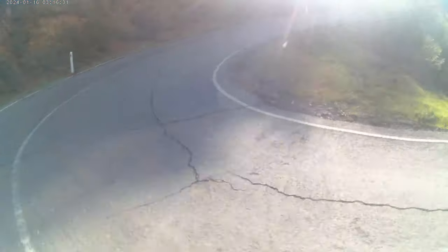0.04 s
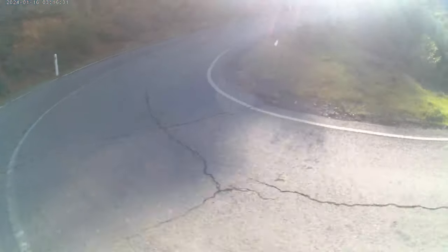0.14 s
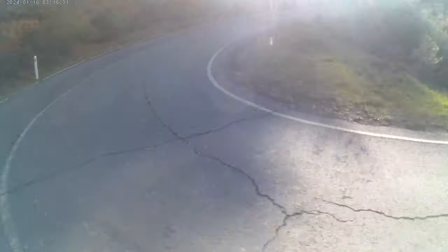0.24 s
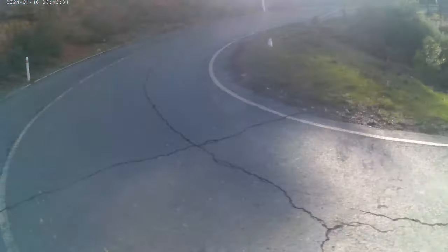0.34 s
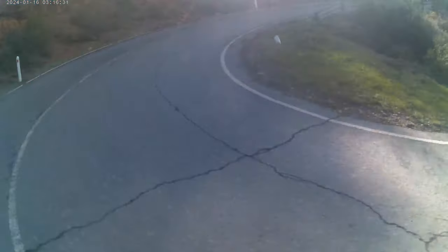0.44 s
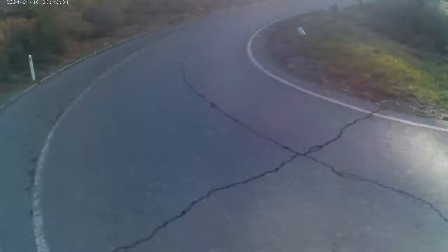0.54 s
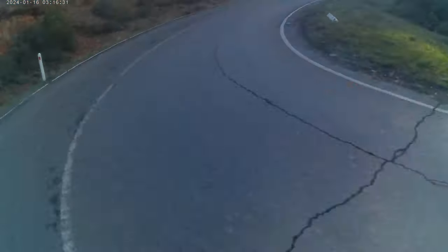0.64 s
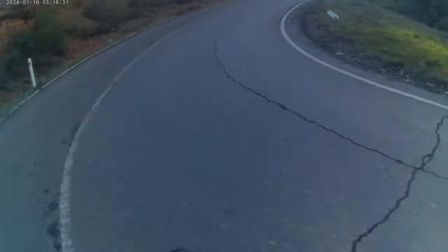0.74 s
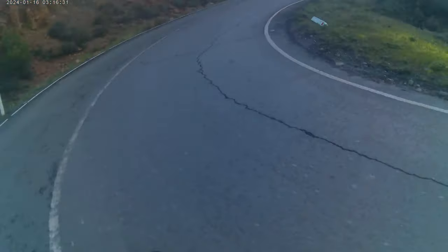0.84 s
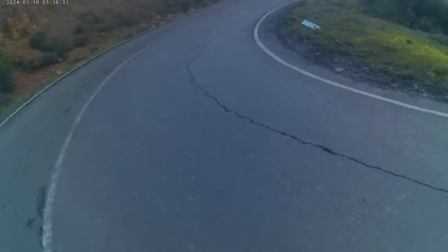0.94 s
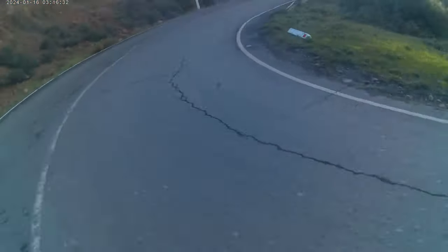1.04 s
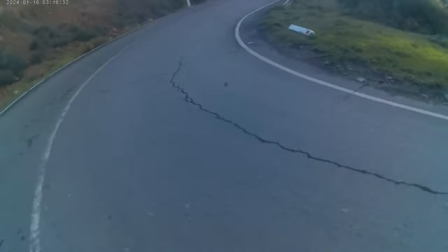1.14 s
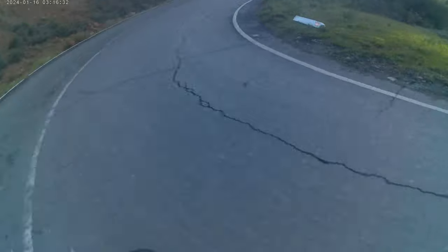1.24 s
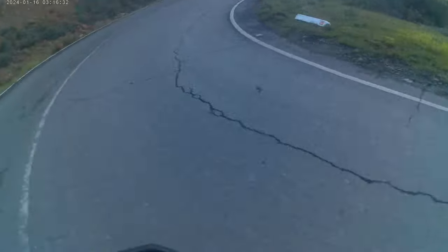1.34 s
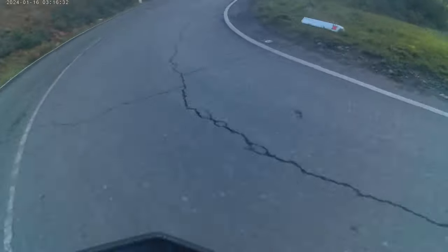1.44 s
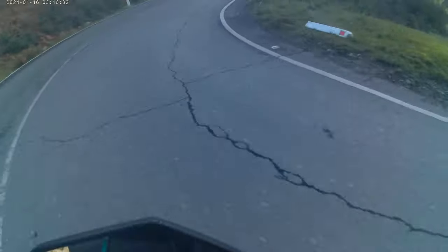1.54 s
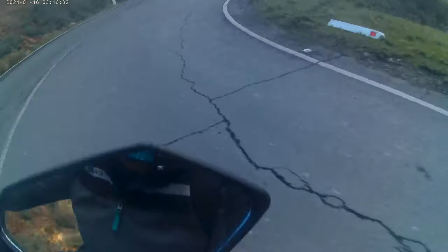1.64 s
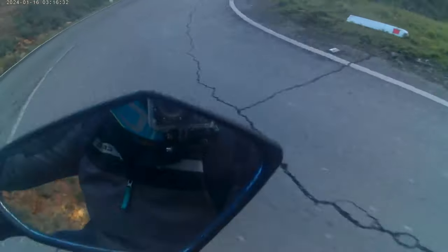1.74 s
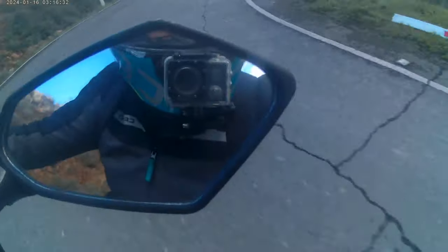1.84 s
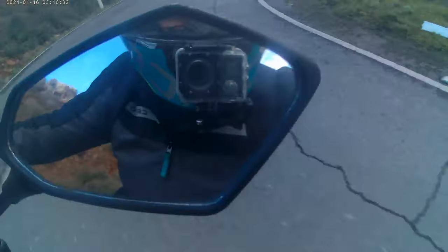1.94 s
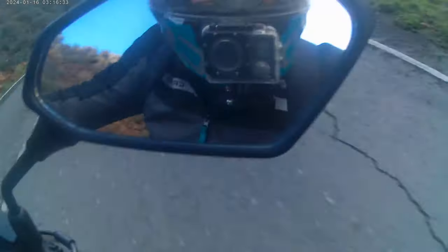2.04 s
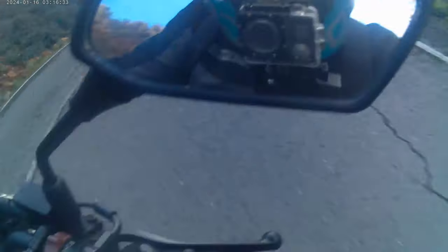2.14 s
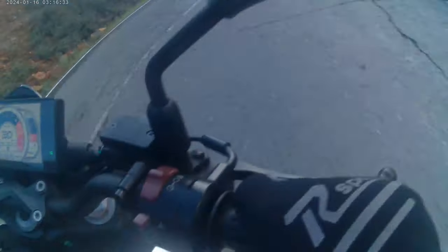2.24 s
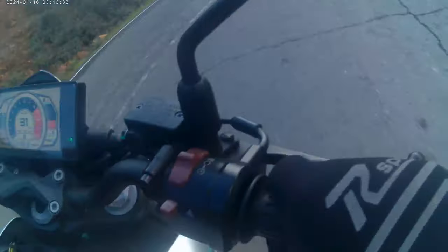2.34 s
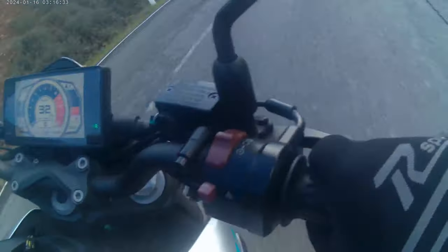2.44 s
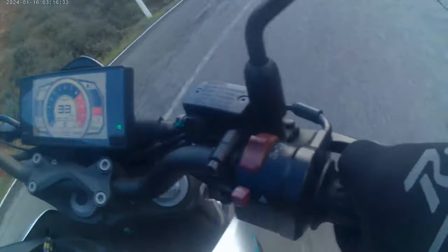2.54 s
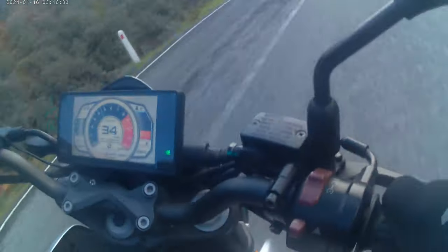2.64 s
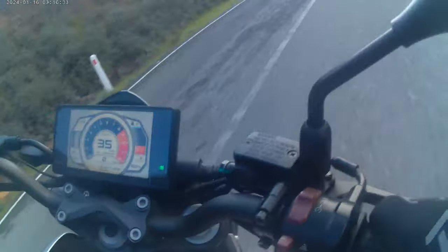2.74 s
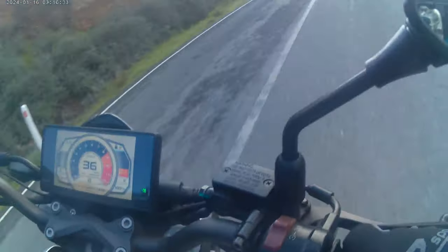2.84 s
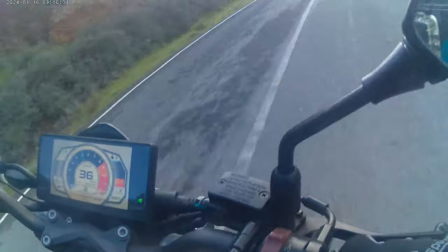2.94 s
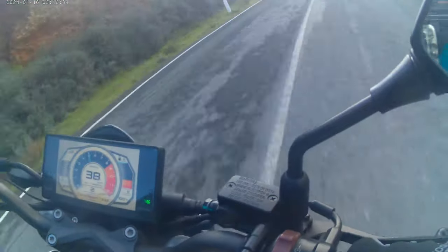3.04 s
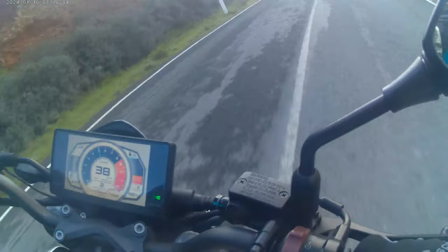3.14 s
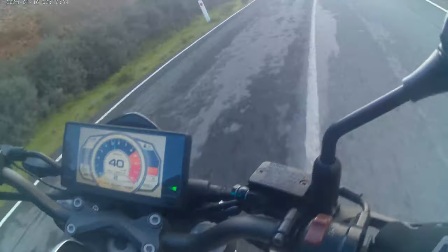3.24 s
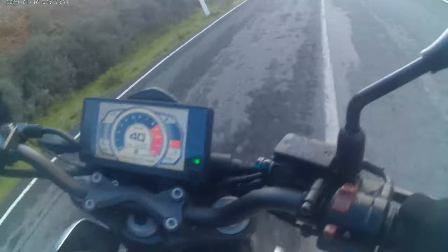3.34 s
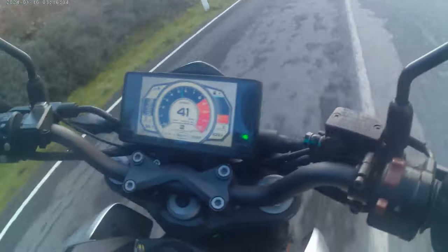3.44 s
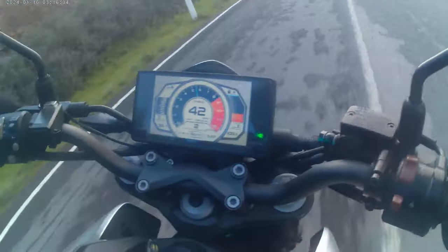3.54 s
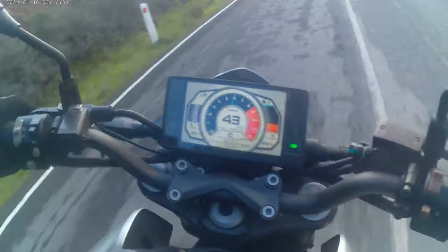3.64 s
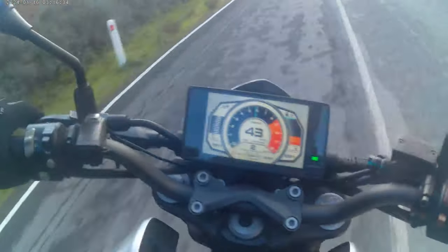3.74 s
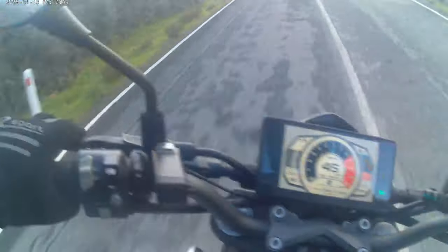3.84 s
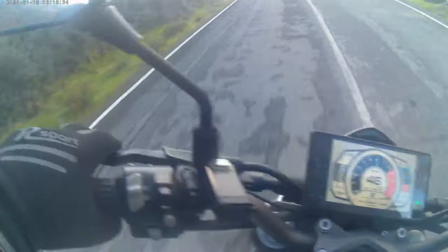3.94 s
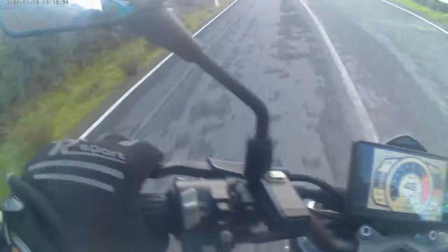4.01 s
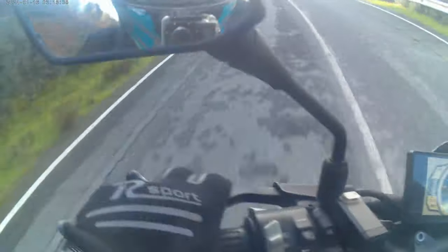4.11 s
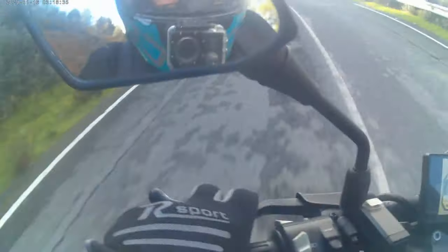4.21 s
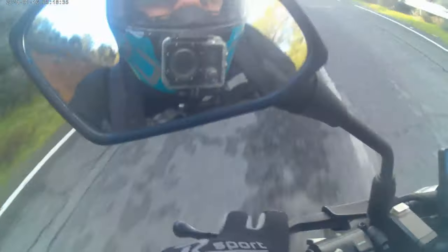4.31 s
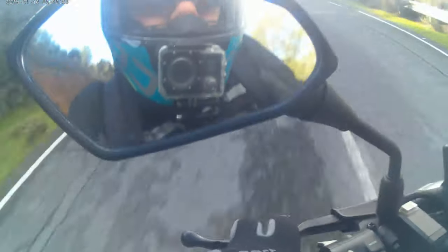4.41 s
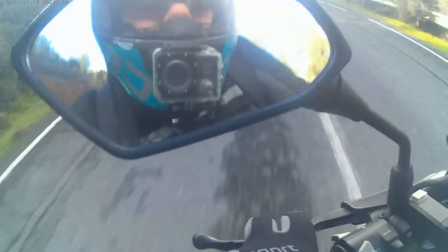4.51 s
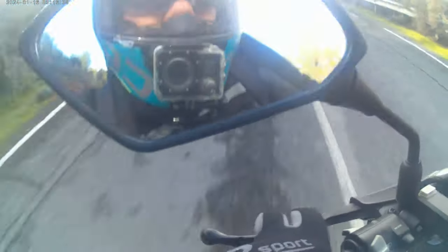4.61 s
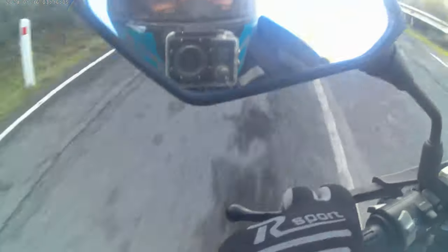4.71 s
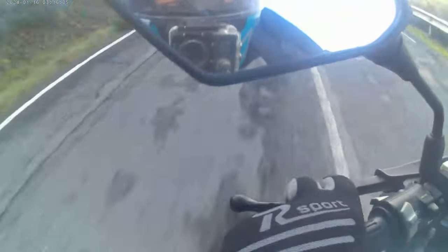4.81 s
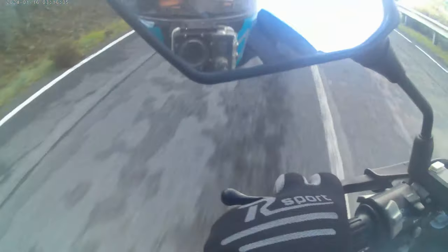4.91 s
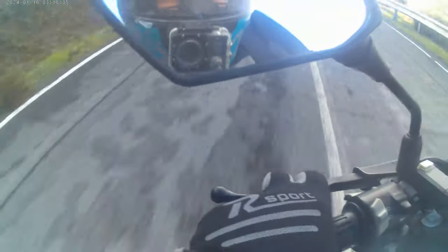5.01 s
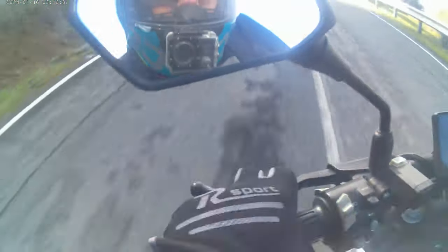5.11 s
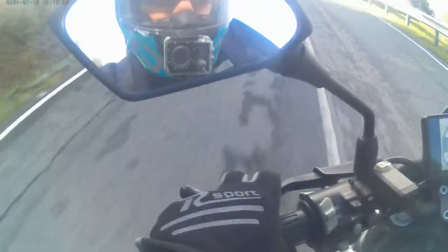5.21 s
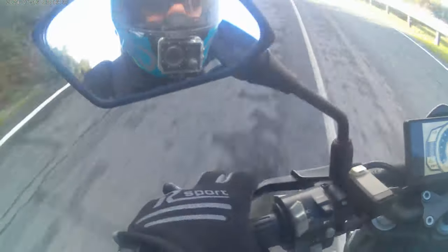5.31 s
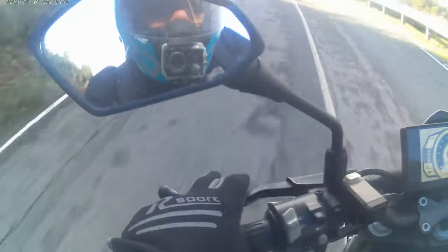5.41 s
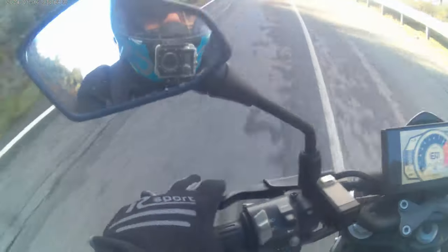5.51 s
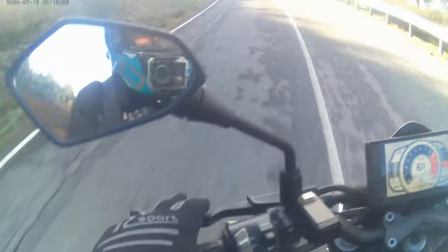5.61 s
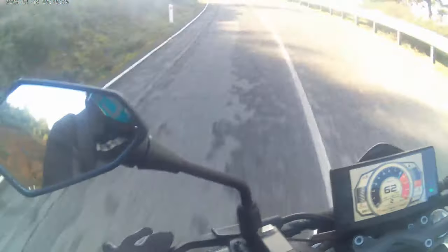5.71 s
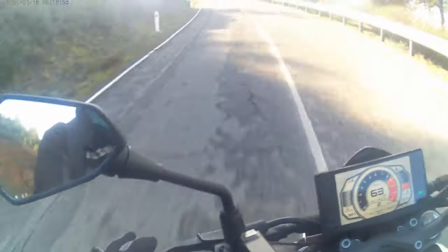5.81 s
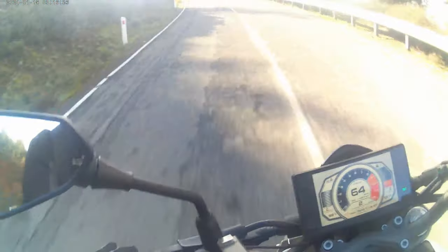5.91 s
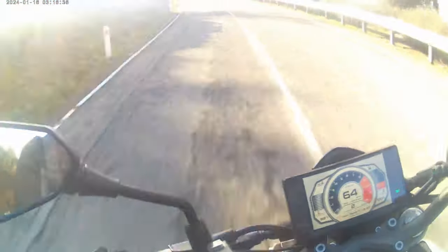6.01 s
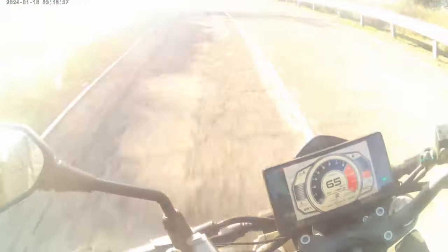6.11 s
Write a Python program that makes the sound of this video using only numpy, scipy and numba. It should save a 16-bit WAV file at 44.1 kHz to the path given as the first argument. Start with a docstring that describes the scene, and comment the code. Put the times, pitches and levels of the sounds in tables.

```python
"""Single-cylinder motorcycle, ridden with a microphone on the rider

A four-stroke single coasts through a bend, then pulls hard in one gear, heard close from the rider's body.
The growl is a sum of engine orders shaped by silencer and airbox; gas pulses ring pipe, shell and intake duct.
Cyclic noise bursts make the valve clatter, an unsteady tone the gear whine, brief noise a tick and a crackle.
Low noise with gusts buffets the microphone; buffeting, slipstream roar and air hiss grow with speed.
"""
import sys
import numpy as np
from scipy import signal
from scipy.fft import rfft, irfft
from scipy.io import wavfile
from scipy.ndimage import uniform_filter1d
from numba import njit

SR = 44100
rng = np.random.default_rng(int(sys.argv[2]) if len(sys.argv) > 2 else 0)


def to_wav(sig):
    """Store sig (one row per channel, or 1-D mono) as 16-bit WAV at the path in sys.argv[1].

    Samples outside -1..1 are clipped; the rate is SR.
    """
    pcm = np.clip(np.atleast_2d(sig), -1, 1) * 32767
    pcm = np.round(pcm).astype(np.int16)
    wavfile.write(sys.argv[1], SR, pcm.T)  # frames by channels


N = 271656
T = np.arange(N) / SR  # time in s

# Engine speed, one firing per cycle: start_s, firing_hz
FIRING_RATE = [(0.0, 30.08), (0.15, 28.68), (0.65, 25.55), (0.85, 25.63), (1.2, 26.18), (1.6, 28.17),
               (1.9, 30.97), (2.3, 33.93), (2.6, 37.36), (3.1, 42.43), (3.7, 48.6), (4.3, 53.88),
               (4.9, 60.33), (5.3, 65.1), (5.65, 68.82), (5.8, 68.88), (6.16, 72.3)]
# The rider's hand, shut in the bend, eased on, then wound open: start_s, opening_0_to_1
THROTTLE_OPENING = [(.66, 0.08), (.82, 0.2), (1.79, 0.42), (1.9, 0.55), (2.28, 0.74), (2.55, 0.94),
                    (3.5, .85), (3.8, 0.98), (4.3, .77), (4.9, 0.9), (5.4, 0.83), (5.8, 0.94), (6.16, 0.87)]
# Gas pulse by engine order: order (multiple of firing_hz), overrun_db, light_throttle_db, pulling_db,
# pulling_change_db_per_octave of revs
PULSE_ORDERS = [(2, 5, 5, -7.5, 4), (3, 7, -13, 2.5, 15.5), (4, 11.5, -2, 2.5, 3), (5, -5, 9, -5, 12.5),
                (6, -1, 13, 0, -4), (7, 7, 6, 1.5, -5.5), (8, 3.5, 7, -2, -8.5), (9, -17, -9, -3.5, -9),
                (10, -30, -4, 4, -2), (11, -26, -7, -1, 2.5), (12, -7, -10.5, -5, 4.5)]
# What silencer and airbox pass, ringing near 310 Hz: pitch_hz, level_db
SILENCER_AND_AIRBOX = [(50, -4), (110, -4.5), (150, -18), (205, -20.5), (250, -11.5), (280, -11),
                       (302, -5.5), (322, -6.5), (355, -20.5), (420, -19), (480, -23), (530, -22),
                       (600, -29.5), (850, -22)]
# Resonances; the width is that of each of two filter passes, the level is relative: pitch_hz, width_hz, level_db
PIPE_MODES = [(618, 200, -8), (1003, 105, -2), (1130, 133, 0), (1221, 60, 4), (1309, 140, 4),
              (1500, 58, -9), (1667, 136, -3), (1934, 150, -6)]
SHELL_MODES = [(455, 106, 4.5), (569, 71, 3.5), (657, 82, 2)]  # the silencer's shell, heard on a light throttle
DUCT_MODES = [(669, 62, 3), (728.5, 25, -0.5), (792.7, 70, 10.5), (916.4, 44, 4)]  # the intake duct
# Mechanical knocks within one cycle: position_cycles, decay_cycles, relative_size
VALVE_KNOCKS = [(.05, 0.1, 0.71), (.3, 0.15, 0.53), (.6, 0.067, 0.53)]
# Noise colours, relative levels, silent outside the end points: pitch_hz, level_db
CLATTER_COAST_COLOUR = [(120, 2.5), (220, -6), (400, -2.5), (600, -6), (750, -2.5), (910, 0), (1100, -9.5),
                        (1350, -0.5), (1560, 2.5), (1780, 0), (2000, -7), (2400, -14), (3200, -26.5)]
CLATTER_PULL_COLOUR = [(200, -7.5), (320, -4), (430, -0.5), (560, -5.5), (800, -6), (1020, -9), (1280, -1),
                       (1550, 1), (1950, -3.5), (2200, -12.5), (2500, -20), (3200, -30.5)]
HISS_COAST_COLOUR = [(1410, -35.5), (2400, -10.5), (2480, -28), (2870, -3), (3200, -12), (3550, -5.5),
                     (3990, -11.5), (4340, -4), (5000, -4), (5490, -12.5), (6670, -10.5), (7330, -22),
                     (8300, -22.5), (14400, -30), (15500, -31)]
HISS_PULL_COLOUR = [(1410, -47.5), (2400, -13), (2760, -4.5), (3150, -7), (3490, -1), (3770, -3),
                    (4380, -6.5), (5120, -9), (5580, -13), (6880, -14.5), (8500, -27.5), (12200, -31),
                    (15500, -43.5)]  # also colours the hiss of the slipstream
BUFFET_COLOUR = [(8, -9.5), (14, -7.5), (26, 10.5), (45, 0.5), (70, -30.5), (160, -29), (400, -68.5)]
ROAR_COLOUR = [(40, -3.5), (70, 1.5), (120, -3), (200, -3.5), (320, -12.5), (450, -16), (800, -33)]
# A small tick, then a short crackle beside a gust: start_s, level_db (before the attack is rounded), decay_s
CRACKLES = [(0.856, -42, 0.02), (4.759, -18.5, 0.0024)]
# The strongest eddies of the headwind: peak_s, level_db, half_length_s
HEADWIND_GUSTS = [(1.023, -29, 0.07), (1.57, -32.5, 0.086), (2.02, -34, 0.2), (2.243, -34, 0.071),
                  (3.968, -29, 0.082), (4.42, -38, 0.056), (4.739, -21.5, 0.04), (5.059, -33, 0.063),
                  (5.321, -34, .04), (5.6, -28, .06), (5.928, -33, 0.067)]

CRUISE_HZ = 50  # reference revs, in firings per second
# Levels: dB wide open at cruising revs, dB change with the throttle shut, dB per octave of revs
GAS_DB, GAS_SHUT_DB, GAS_OCTAVE_DB = -14.5, -26.5, 10
DUCT_DB, DUCT_SHUT_DB, DUCT_OCTAVE_DB = -36, -57, 2.5
RASP_DB, RASP_SHUT_DB, RASP_OCTAVE_DB = -35.5, -12.5, 19.5
CLATTER_DB, CLATTER_SHUT_DB, CLATTER_OCTAVE_DB = -31.5, -16.5, 8.5
HISS_DB, HISS_SHUT_DB, HISS_OCTAVE_DB = -50, -22.5, 2
# In one gear road speed follows the revs, and the wind with it: dB at cruising revs, dB per octave of speed
BUFFET_DB, BUFFET_OCTAVE_DB = -43, 5
ROAR_DB, ROAR_OCTAVE_DB = -39, 19.5
AIR_HISS_DB, AIR_HISS_OCTAVE_DB = -56.5, 26.5
# Throttle openings (0-1) where the light pulse is formed, starts to give way, and has become the pulling one
LIGHT_FROM, LIGHT_TO, PULL_FROM = .15, .35, .53
# Combustion stumbles as the throttle is picked up: constant unevenness, extra, centre opening, range (0-1)
UNEVEN, STUMBLE_EXTRA, STUMBLE_AT, STUMBLE_RANGE = .14, .62, .17, .1
# Power (throttle times share of cruising revs) where load begins, and where it is full
SLACK_POWER, FULL_POWER = 0.11, 0.88
# The intake breathes best in the middle revs: extra dB in airbox and duct, centre and range in firings per second
AIRBOX_RAM_DB, DUCT_RAM_DB, RAM_HZ, RAM_RANGE_HZ = 1.5, 4.5, 41.8, 5.1
WANDER_CYCLES = 0.0089  # the crank never turns quite evenly
MIC_HISS_DB, TOP_HZ = -71, 15700


def undb(db):
    """Decibels to gain."""
    return 10 ** (np.asarray(db) / 20)


def curve(table):
    """A table of times and values, interpolated at every sample."""
    start_s, value = np.transpose(table)
    return np.interp(T, start_s, value)


def by_speed(hz, cruise_db, octave_db):
    """A level in dB that changes by a fixed amount with each doubling of speed."""
    return cruise_db + octave_db * np.log2(hz / CRUISE_HZ)


def smooth_twice(x, size):
    """Two running means of size samples."""
    return uniform_filter1d(uniform_filter1d(x, size), size)


def steady(x):
    """Hold a sound near unit level while its single beats stay audible."""
    power = smooth_twice(x * x, SR // 8)
    return x / np.sqrt(power + 1e-18)


def noise(colour):
    """Unit noise whose spectrum follows a colour, interpolated over log frequency."""
    pitch_hz, level_db = np.transpose(colour)
    log_hz = np.log(np.fft.rfftfreq(N, 1 / SR) + 1)
    gain = undb(np.interp(log_hz, np.log(pitch_hz), level_db, left=-np.inf, right=-np.inf))
    x = irfft(rfft(rng.standard_normal(N)) * gain, N)
    return x / x.std()


def walk(rate):
    """Smooth chance that heads for a new value rate times a second, spread 1."""
    size = int(SR / rate)
    steps = np.repeat(rng.standard_normal(N // size + 1), size)
    x = uniform_filter1d(steps, size)[:N]
    return x / x.std()


@njit
def svf(x, hz, width):
    """State-variable band-pass whose centre and width may move."""
    y, band, low = np.empty(len(x)), 0., 0.
    for i in range(len(x)):
        g = np.tan(np.pi * hz[i] / SR)
        damping = width[i] / hz[i]
        v = (band + g * (x[i] - low)) / (1 + g * (g + damping))
        band, low = 2 * v - band, low + 2 * g * v
        y[i] = damping * v
    return y


def ring(x, hz, width):
    """A resonance with steep skirts, from two equal band-passes in a row."""
    hz, width = hz * np.ones(N), width * np.ones(N)
    return svf(svf(x, hz, width), hz, width)


def body(x, modes):
    """Several resonances struck together; neighbours swing in opposite sense."""
    out = 0
    for k, (hz, width, db) in enumerate(modes):
        out = out + (-1) ** k * undb(db) * ring(x, hz, width)
    return out


def pulses(cycle, position, jitter_s, scatter_db, front_hz=3000):
    """One pulse per engine cycle, each a little early or late, strong or weak, with a rounded front."""
    at_s = np.interp(np.arange(int(cycle[-1]) + 1) + position, cycle, T, left=-1, right=-1)
    chance = rng.standard_normal((N // 500, 2))[:len(at_s)]
    place = (at_s + jitter_s * chance[:, 0]) * SR
    inside = (place > 0) & (place < N - 1)
    place, size = place[inside], undb(scatter_db * chance[inside, 1])
    # share each pulse between the two nearest samples
    i = place.astype(int)
    train = np.bincount(i, size * (1 - place + i), N)
    train = train + np.bincount(i + 1, size * (place - i), N)
    return signal.sosfilt(signal.butter(2, front_hz, fs=SR, output="sos"), train)


def burst(cycle, position, length):
    """An envelope that swells within two milliseconds once a cycle and dies away."""
    decay = np.exp(-((cycle - position) % 1) / length)
    return smooth_twice(decay, SR // 1000)


def growl(cycle, hz, throttle, effort_db, ram_db, smear=0.04536, upper_smear=0.0857, revs_smear=0.2405,
          position=0.298):
    """The low engine orders climb through the fixed resonances of silencer and airbox."""
    tract_hz, tract_db = np.transpose(SILENCER_AND_AIRBOX)
    stumble = UNEVEN + STUMBLE_EXTRA * np.exp(-((throttle - STUMBLE_AT) / STUMBLE_RANGE) ** 2)
    strength, lateness = stumble * walk(40), stumble * walk(30)  # shared by all orders
    firing = np.clip(throttle / LIGHT_FROM, 0, 1)
    pulling = np.clip((throttle - LIGHT_TO) / (PULL_FROM - LIGHT_TO), 0, 1)
    high_revs = np.maximum(np.log2(hz / CRUISE_HZ), 0)  # octaves above cruising revs
    out = 0
    for order, (_, overrun_db, light_db, pull_db, octave_db) in enumerate(PULSE_ORDERS, 2):
        above = order - 5
        upper = max(above, 0)
        db = (1 - firing) * overrun_db + (firing - pulling) * light_db
        db = db + pulling * by_speed(hz, pull_db, octave_db)
        db = db + np.interp(np.log(order * hz), np.log(tract_hz), tract_db)
        db = db + ram_db * (upper > 1)
        db = db + min(upper * .6, 2.5) * walk(6)  # the upper orders swell and fade on their own
        # the pipes delay higher orders more, spreading each pulse over its cycle; at high revs pulses merge
        lag = smear * order ** 2 + upper_smear * upper ** 2 + revs_smear * high_revs * above ** 2
        turns = order * (cycle - position + 0.0086 * lateness) - lag
        out = out + undb(db) * np.sin(2 * np.pi * turns)
    return out * undb(effort_db + 3.7 * strength)


def exhaust(cycle, throttle, load, effort_db, rasp_db, second_kick=0.46, shell_db=-10.0):
    """The valve kicks the pipe on opening and again on shutting, which favours every second or third order."""
    opening = pulses(cycle, .05, jitter_s=.00003, scatter_db=1.6)
    shutting = pulses(cycle, .45, jitter_s=.00003, scatter_db=1.6)
    rasp = steady(body(opening + second_kick * shutting, PIPE_MODES)) * undb(rasp_db)
    light = np.clip(throttle / LIGHT_FROM, 0, 1) * (1 - load) ** 2  # firing, but not yet under load
    shell = steady(body(opening + shutting, SHELL_MODES)) * undb(effort_db + shell_db) * light
    return rasp + shell


def intake(cycle, duct_db, closing=0.14):
    """Each gulp of air rings the intake duct, and the closing valve rings it again."""
    gulps = pulses(cycle, .55, jitter_s=.00002, scatter_db=1.0)
    slams = pulses(cycle, .7, jitter_s=.00002, scatter_db=1.0)
    return steady(body(gulps + closing * slams, DUCT_MODES)) * undb(duct_db)


def clatter(cycle, load, clatter_db, hiss_db):
    """Valve gear and rushing gas: noise in bursts tied to the cycle, over the even roll of chain and tyres."""
    knocks = sum(size * burst(cycle, position, length) for position, length, size in VALVE_KNOCKS)
    knocks = knocks * undb(3.6 * walk(110))  # now and then one knock stands out
    coast, pull = np.sqrt(1 - load), np.sqrt(load)
    casing = coast * noise(CLATTER_COAST_COLOUR) + pull * noise(CLATTER_PULL_COLOUR)
    casing = casing * (1.26 + knocks)
    hiss = coast * noise(HISS_COAST_COLOUR) + pull * noise(HISS_PULL_COLOUR)
    hiss = hiss * (0.61 + knocks) * undb(0.55 * walk(24))
    return steady(casing) * undb(clatter_db) + steady(hiss) * undb(hiss_db)


def gears(cycle, load, teeth_per_cycle=60, whine_db=-58):
    """The primary gears sing at their tooth-meshing rate, unsteadily, and fade as the engine takes up load."""
    mesh = np.sin(2 * np.pi * teeth_per_cycle * cycle + 1.5 * walk(80))
    return mesh * undb(whine_db + 1.9 * walk(17)) * (1 - load)


def crackles():
    """Brief noise bursts under short decays: a small tick, then a short crackle as a gust hits the microphone."""
    envelope = 0
    for start_s, db, decay_s in CRACKLES:
        envelope = envelope + undb(db) * (T >= start_s) * np.exp(-np.abs(T - start_s) / decay_s)
    envelope = smooth_twice(envelope, SR // 800)
    return envelope * noise([(400, -15), (1700, 16), (2800, -4), (6500, -20), (8000, -38)])


def wind(hz, flutter_db=3.2):
    """Eddies push on the microphone port, over the roar and hiss of the slipstream."""
    small = undb(by_speed(hz, BUFFET_DB, BUFFET_OCTAVE_DB) + flutter_db * walk(15))
    large = sum(undb(db) * np.exp(-((T - peak_s) / length_s) ** 2) for peak_s, db, length_s in HEADWIND_GUSTS)
    buffets = steady(noise(BUFFET_COLOUR)) * np.hypot(small, large)
    roar = noise(ROAR_COLOUR) * undb(by_speed(hz, ROAR_DB, ROAR_OCTAVE_DB) + 1.3 * walk(10))
    hiss = noise(HISS_PULL_COLOUR) * undb(by_speed(hz, AIR_HISS_DB, AIR_HISS_OCTAVE_DB))
    return buffets + roar + hiss


def scene():
    """Engine speed and throttle drive the machine, and engine speed the wind."""
    hz = curve(FIRING_RATE)
    throttle = np.clip(curve(THROTTLE_OPENING), 0, 1)
    cycle = np.cumsum(hz) / SR + WANDER_CYCLES * walk(11)
    power = throttle * hz / CRUISE_HZ
    load = np.clip((power - SLACK_POWER) / (FULL_POWER - SLACK_POWER), 0, 1) ** 1.96
    choke = (1 - throttle) ** 2  # the first part of the twist lets in most of the air
    ram = np.exp(-((hz - RAM_HZ) / RAM_RANGE_HZ) ** 2)

    effort_db = by_speed(hz, GAS_DB, GAS_OCTAVE_DB) + GAS_SHUT_DB * (1 - throttle)
    duct_db = by_speed(hz, DUCT_DB, DUCT_OCTAVE_DB) + DUCT_SHUT_DB * choke + DUCT_RAM_DB * ram
    rasp_db = by_speed(hz, RASP_DB, RASP_OCTAVE_DB) + RASP_SHUT_DB * choke
    rasp_db = rasp_db + 1.3 * walk(7.8)  # the rasp surges
    clatter_db = by_speed(hz, CLATTER_DB, CLATTER_OCTAVE_DB) + CLATTER_SHUT_DB * choke + walk(8)
    hiss_db = by_speed(hz, HISS_DB, HISS_OCTAVE_DB) + HISS_SHUT_DB * choke + .5 * walk(8)

    engine = growl(cycle, hz, throttle, effort_db, AIRBOX_RAM_DB * ram)
    engine = engine + exhaust(cycle, throttle, load, effort_db, rasp_db)
    engine = engine + intake(cycle, duct_db)
    machine = clatter(cycle, load, clatter_db, hiss_db) + gears(cycle, load)
    return (engine + machine + crackles() + wind(hz))[None]


def record(dry):
    """The microphone adds faint hiss; the sound stops without a click, and the top is cut."""
    x = dry + undb(MIC_HISS_DB) * rng.standard_normal(dry.shape)
    x = x * np.clip((T[-1] - T) / .004, 0, 1)  # fade over the last 4 ms
    return signal.sosfilt(signal.ellip(10, .2, 80, TOP_HZ, fs=SR, output="sos"), x)


dry = scene()
out = record(dry)
to_wav(out)
```